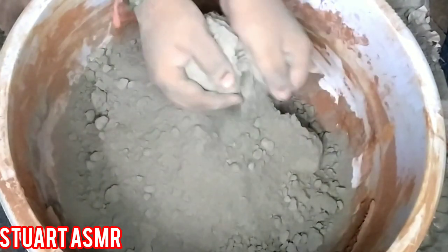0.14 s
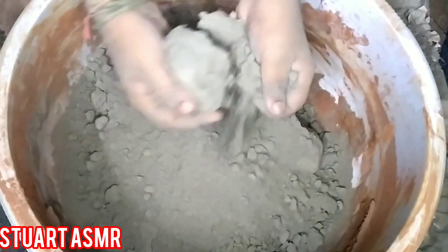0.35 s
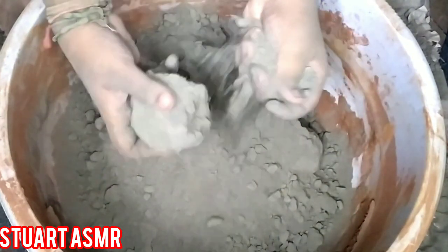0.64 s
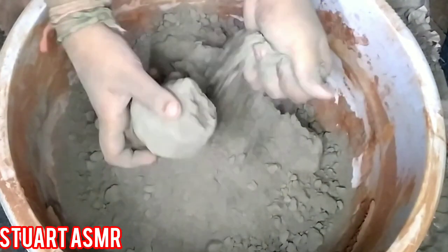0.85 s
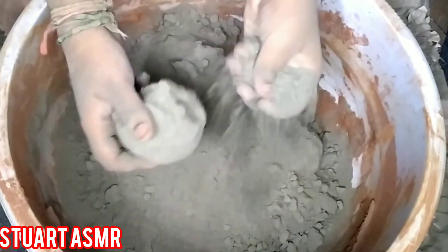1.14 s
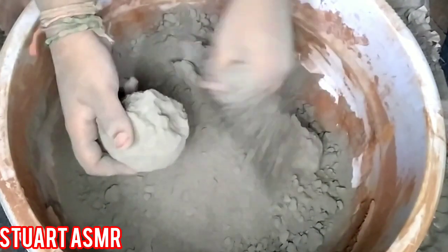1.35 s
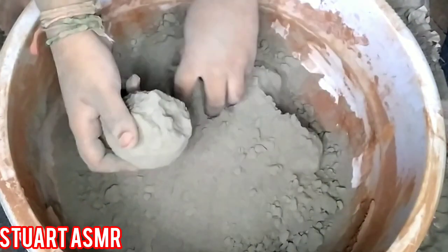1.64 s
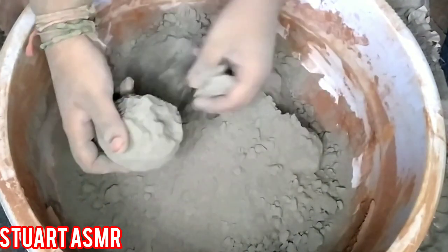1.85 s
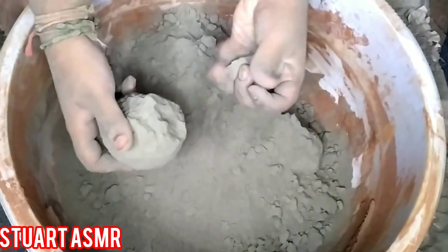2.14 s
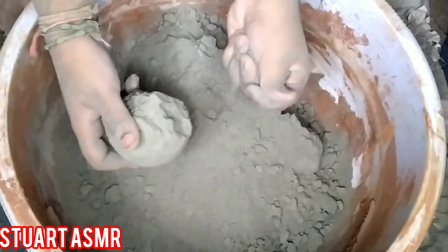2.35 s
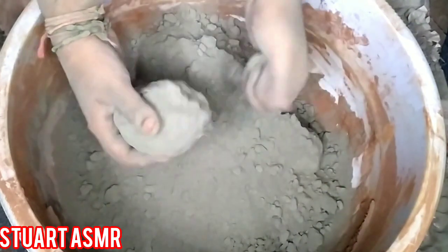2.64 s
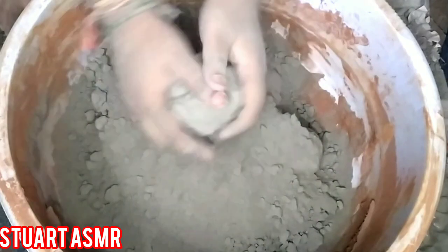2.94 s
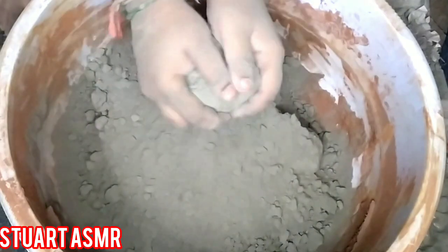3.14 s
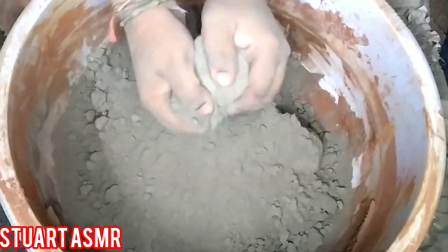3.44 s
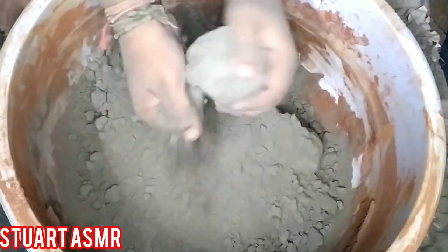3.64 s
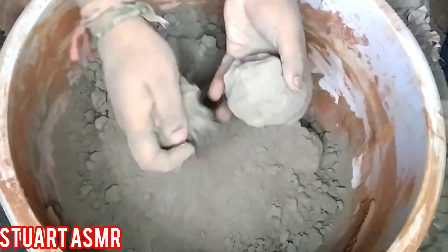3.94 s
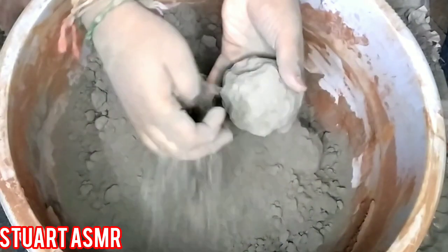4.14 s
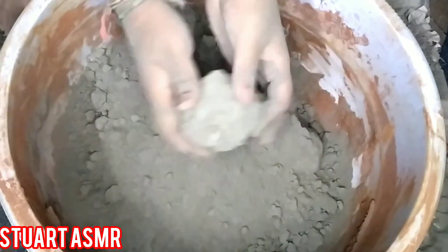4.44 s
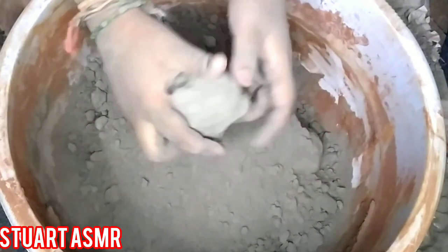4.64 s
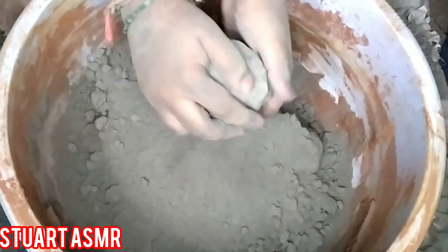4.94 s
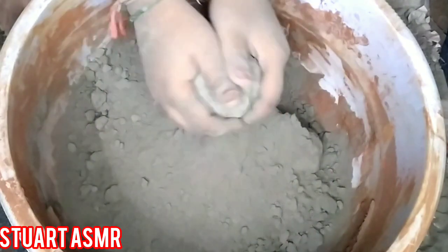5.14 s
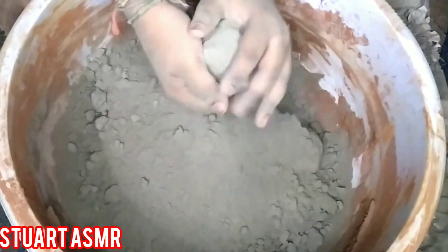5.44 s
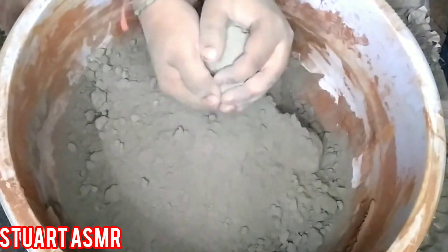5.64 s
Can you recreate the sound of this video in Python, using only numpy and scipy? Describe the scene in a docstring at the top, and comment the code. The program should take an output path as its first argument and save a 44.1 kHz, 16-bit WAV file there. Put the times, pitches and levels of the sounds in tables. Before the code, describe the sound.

Dry clods crumble in bare hands in a quiet room, miked closely. Uneven crunches, small snaps and falling grains fill the start, pause briefly over low hum, then return as scratchy grinding and hissing dust. Just after four seconds a dense cluster of harsh, clipping snaps bursts out with soft low thumps, followed by lighter grit rubbing and small ticks.

```python
"""Crushing dry cement lumps by hand

Bare hands crush dry cement lumps over a wide basin, close to a small microphone.
Random grains ring the basin, lumps, grit and dust: crumbs patter, lumps grind, fine grit hisses.
Breaks are single snaps with a dying run of splinters; low pushes make soft thumps as handfuls land.
Shaped noise makes the hum of a quiet room and one faint fuzzy whistle.
A noise suppressor breaks faint sounds into streaks, and the loudest cracks clip."""
import sys
import numpy as np
from scipy import signal
from scipy.fft import rfft, irfft
from scipy.io import wavfile
from scipy.ndimage import uniform_filter1d

SR = 44100
rng = np.random.default_rng(int(sys.argv[2]) if len(sys.argv) > 2 else 0)


def wav_out(sig):
    """Save sig, one row per channel (or a flat mono array), as 16-bit PCM at SR to the path in sys.argv[1]."""
    wavfile.write(sys.argv[1], SR, np.round(np.clip(np.atleast_2d(sig).T, -1, 1) * 32767).astype(np.int16))


N = 255780

# Ringing modes of each body: f/Hz, width before damping/Hz, strength/dB
FLOOR_MODES = [(368, 104, -1.5), (414.4, 94, 0), (510, 134, -14.5), (195, 450, -30)]
WALL_MODES = [(619, 86.5, 7.5), (860, 210, -13.5)]
BIG_LUMP_MODES = [(943, 120, 1), (1193, 213, 10), (1479, 120, 5.5), (1616, 184, 10)]
SMALL_LUMP_MODES = [(2004, 380, -3), (2532, 195, 8), (2921, 168, -0.5), (3460, 520, 6.5), (4570, 650, -2)]
GRIT_MODES = [(5085, 1600, -8.5), (6490, 370, -5.5), (7050, 230, -2), (7210, 1400, -5)]
DUST_MODES = [(8880, 3100, -3.5), (11510, 1700, -1), (13500, 1700, -7.5), (15300, 510, -11.5)]
# The four crushed bodies, coarse to fine: steps 1 to 4 on the fineness scale
CRUSHED = (BIG_LUMP_MODES, SMALL_LUMP_MODES, GRIT_MODES, DUST_MODES)
BODIES = (FLOOR_MODES, WALL_MODES) + CRUSHED
BREADTH_DB = 10  # drop in level one breadth away from the fineness


def gain_of(db):
    """Turns decibels into gain."""
    return 10 ** (np.asarray(db) / 20)


def evened(x):
    """Scales a sound to rms 1."""
    return x / np.sqrt(np.mean(x ** 2) + 1e-20)


def peaked(sound, db):
    """Scales a sound to a peak level in dB."""
    return gain_of(db) * sound / abs(sound).max()


def add(mix, s, sound):
    """Mixes a sound in at a time in seconds."""
    part = mix[round(s * SR):][:len(sound)]
    part += sound[:len(part)]


def ring(modes, chance_db=None, damping=0.87):
    """One tap on a body: dying sines whose soft start steepens the skirts of each mode, energy 1."""
    t = np.arange(1400) / SR
    hz, width, db = np.transpose(modes)[:, :, None]
    width = width * damping
    if chance_db is not None:
        db = db + chance_db[:len(modes), None]
    sign = (-1.) ** np.arange(len(modes))[:, None]
    strength = sign * gain_of(db) * np.sqrt(width)
    soft_start = (1 - np.exp(-6. * width * t)) ** 2
    sines = np.exp(-np.pi * width * t) * np.sin(2 * np.pi * hz * t)
    tap = (strength * sines * soft_start).sum(0)
    return tap / np.linalg.norm(tap)


def shares_db(fineness, breadth):
    """Splits a contact over the crushed bodies: most at its fineness, less to either side."""
    step = np.arange(1, len(CRUSHED) + 1)
    distance = (step - np.clip(fineness, 0, len(BODIES))) / max(breadth, .4)
    dust_db = -10  # dust is always fainter
    return -BREADTH_DB * distance ** 2 + dust_db * (step == step[-1])


def swell_db(t, s, rise_s, fall_s):
    """A rise and fall in level: 0 dB at the peak, 20 dB down at the ends of the rise and fall."""
    roundness = 1.043  # 1 is a peaked swell, 2 a rounded one
    side_s = np.maximum(np.where(t < s, rise_s, fall_s), .005)
    return -20 * (abs(t - s) / side_s) ** roundness


def hands():
    """Level in dB of each body over time: showers add up in the basin, squeezes in the other bodies."""
    # Showers of crumbs landing in the basin: peak t/s, floor level/dB, wall level/dB, rise/s, fall/s
    shower_list = [(0.0, -41.5, -48, .1, 0.15), (0.149, -45, -46, 0.13, 0.17),
                   (.26, -42.5, -41.5, 0.18, 0.73), (.37, -42.5, -50, 0.45, 0.115),
                   (0.47, -40.5, -50.5, 0.075, 0.2), (.57, -43, -44.5, 0.1, 0.32),
                   (0.738, -38, -54, 0.12, 0.27), (0.9, -48.5, -52, 0.031, 0.53),
                   (1.04, -41, -50, 0.24, 0.2), (1.24, -62.5, -51, 0.095, .15),
                   (1.31, -40.5, -64, 0.098, 0.17), (1.462, -41, -42.5, 0.52, 0.22),
                   (1.539, -39, -39.5, 0.34, 0.13), (1.62, -47.5, -52, 0.086, 0.44),
                   (1.78, -61.5, -47.5, 0.077, 0.14), (2.411, -51, -74, 0.041, 0.14),
                   (2.699, -42.5, -73, 0.18, 0.22), (2.85, -45.5, -61, 0.025, 0.14),
                   (2.919, -40, -44.5, 0.12, 0.14), (3.09, -70.5, -54.5, 0.045, 0.33),
                   (3.259, -44, -72.5, 0.021, 0.036), (3.477, -45.5, -51, 0.059, 0.12),
                   (3.63, -41, -50, 0.14, 0.38), (3.78, -49, -59, .1, 0.2), (3.95, -51.5, -50, 0.25, 0.18),
                   (4.102, -39, -57, 0.051, 0.18), (4.224, -46.5, -49.5, 0.09, 0.21),
                   (4.371, -39, -38, 0.15, 0.26), (4.459, -53, -60, 0.19, 0.13),
                   (4.56, -41, -56.5, 0.08, 0.16), (4.681, -40.5, -40, 0.063, 0.18),
                   (5.371, -52.5, -51.5, 0.054, 0.32), (5.5, -50, -52, 0.068, 0.24),
                   (5.69, -67, -48.5, 0.081, 0.2)]
    # Squeezes and rubs: peak t/s, level before sharing/dB, fineness/steps, breadth/steps, rise/s, fall/s
    squeeze_list = [(.005, -39, 2.64, 1.87, 0.18, 0.13), (0.164, -40.5, 1.8, 7.5, 0.063, 0.25),
                    (.25, -40, 1.8, 0.71, 0.31, 0.11), (.4, -44, 1.67, 1.02, 0.92, 0.25),
                    (0.531, -40.5, 1.78, 1.12, 0.22, 0.19), (.65, -45, 2.07, 1.6, 0.11, 0.68),
                    (.73, -43.5, 3.5, 1.3, 0.31, 0.026), (0.886, -36, 2.82, 1.83, 0.071, 0.13),
                    (0.988, -38.5, .7, 1.14, 0.066, 0.082), (1.095, -41, 2.97, 0.92, 0.047, 0.11),
                    (1.136, -43, 1.57, 0.74, 0.39, 0.19), (1.251, -42, 1.94, 1.08, 0.032, 0.42),
                    (1.449, -38.5, 0.32, 1.3, 0.097, 0.1), (1.526, -36, 1.64, 1.03, 0.14, 0.13),
                    (1.7, -49.5, 1.79, 1.15, 0.11, 0.56), (2.35, -46, 1.88, 0.8, 0.15, 0.24),
                    (2.395, -44, 2.87, 1.16, 0.1, 0.083), (2.491, -41, 3.02, 1.74, 0.088, 0.53),
                    (2.661, -30, 4.68, 1.05, 0.06, 0.15), (2.785, -40.5, 2.4, 0.84, 0.018, 0.097),
                    (2.879, -38, 1.38, 1.05, 0.09, 0.18), (3.016, -47, 1.1, 1.2, 0.017, 0.14),
                    (3.028, -38, 2.95, 1.46, 0.067, 0.12), (3.261, -38, 2.77, 1.22, 0.018, 0.06),
                    (3.36, -53, 1.8, 0.63, 0.032, 0.57), (3.478, -43, 2.53, 0.97, 0.3, 0.18),
                    (3.616, -35, 2.8, 1.76, 0.15, 0.1), (3.66, -36, 0.34, 1.06, 0.23, 0.055),
                    (3.7, -40, 2.33, 1.9, 0.12, 0.18), (3.75, -39.5, 2.84, 1.46, 0.13, 0.02),
                    (3.959, -31, 5.19, 3.3, 0.057, 0.14), (4.099, -37.5, 3.8, 2.7, 0.047, 0.049),
                    (4.18, -33.5, 1.66, 2.3, 0.085, 0.14), (4.24, -36, 2.24, 2, 0.067, 0.42),
                    (4.345, -28.5, 0.91, 2.2, 0.062, 0.16), (4.42, -38, 2.9, 1.1, 0.22, 0.41),
                    (4.491, -39, 1.1, 4.4, 0.074, 0.046), (4.6, -43, 0.72, 1.8, 0.087, 0.089),
                    (4.671, -31.5, 0.27, 2.35, 0.028, 0.096), (4.74, -38, 0.52, 1.2, 0.15, 0.22),
                    (4.819, -35.5, 2.93, 1.63, 0.14, 0.15), (4.981, -41.5, 3.03, 0.82, 0.1, 0.46),
                    (5.113, -44.5, 2.66, 0.91, .015, 0.12), (5.264, -40, 3.02, 1.2, 0.14, 0.19),
                    (5.379, -38, 3.12, 2.27, 0.06, 0.077), (5.429, -44.5, 2.7, 2, .08, 0.14),
                    (5.509, -40, 1.47, 2.2, 0.028, 0.077), (5.64, -47, 2.66, 0.62, 0.3, 0.032),
                    (5.772, -48, 2.4, 1.4, 0.21, 0.061)]
    t = np.arange(0, N + 64, 64) / SR
    power = np.full((len(BODIES), len(t)), 1e-10)
    for s, floor_db, wall_db, rise_s, fall_s in shower_list:
        basin_db = np.array([[floor_db], [wall_db]])
        power[:2] += gain_of(basin_db + swell_db(t, s, rise_s, fall_s)) ** 2
    for s, db, fineness, breadth, rise_s, fall_s in squeeze_list:
        body_db = db + shares_db(fineness, breadth)[:, None]
        power[2:] += gain_of(body_db + swell_db(t, s, rise_s, fall_s)) ** 2
    return t, 10 * np.log10(power)


def patchy(x, patch_db, level_db):
    """The grip keeps shifting, so narrow bands come and go while the loudness stays."""
    grip_s = 0.046  # time over which a band's random drift fades
    z = signal.stft(x, nperseg=512, noverlap=384)[2]
    # one random value for every three neighbouring bands, smoothed over time
    field = rng.standard_normal((z.shape[1], len(z) // 3 + 1)).T
    field = np.repeat(field, repeats=3, axis=0)[:len(z)]
    field = uniform_filter1d(field, size=5, axis=1)
    field = evened(signal.lfilter([1], [1, -np.exp(-128 / SR / grip_s)], field))
    # hard work means many contacts, which even out
    few = np.clip((-24.5 - level_db[::128]) / 20.8, .15, 1)
    patch_db = patch_db * np.pad(few, (0, len(field[0]) - len(few)), "edge")
    gain = gain_of(patch_db * np.clip(field, -2, .9))
    # keep the loudness of every moment
    colour = (abs(z) ** 2).mean(1, keepdims=True)
    gain /= np.sqrt((gain ** 2 * colour).sum(0) / colour.sum())
    return signal.istft(z * gain, nperseg=512, noverlap=384)[1][:N]


def crumbling():
    """Uneven random grains strike each body; hard work deadens the ring and throws splinters."""
    # Grains striking each entry of BODIES in turn: rate/(1/s), spread of grain size/dB,
    # patchiness in light work/dB, width factor of the modes when crushed hard/1
    grain_list = [(562.5, 3, -0.5, 1.02), (575, 4, 6, 1.5), (880, 3, 6, 2.4), (1415, 3, 9, 3.8),
                  (3920, 3.5, 13, 3), (4970, 4, 11.5, 0.66)]
    crush_db, crush_range_db = -37, 10  # from this level up the tight grip deadens the ring
    hard_db, hard_range_db = -46, 17  # splinters grow from this level, in full this much higher
    s, levels_db = hands()
    t, out = np.arange(N) / SR, np.zeros(N)
    effort_db = np.interp(t, s, 10 * np.log10((gain_of(levels_db) ** 2).sum(0)))
    splinters = evened((rng.random(N) < 220 / SR) * rng.standard_normal(N))  # 220 per second
    splinters = splinters * np.clip((effort_db - hard_db) / hard_range_db, .1, 1)
    crush = np.clip((effort_db - crush_db) / crush_range_db, 0, 1)
    for modes, body_db, grain in zip(BODIES, levels_db, grain_list):
        per_s, spread_db, patch_db, damping = grain
        hit = rng.random(N) < per_s / SR
        sign = rng.choice([-1., 1.], N)
        size = np.minimum(rng.exponential(1, N), 4)
        train = evened(hit * sign * gain_of(spread_db * size))
        level_db = np.interp(t, s, body_db)
        free = signal.oaconvolve(train, ring(modes))[:N]
        free = evened(patchy(free, patch_db, level_db))
        blows = np.sqrt(crush) * train + 0.35 * splinters
        crushed = signal.oaconvolve(blows, ring(modes, damping=damping))[:N]
        out += gain_of(level_db) * (np.sqrt(1 - crush) * free + crushed)
    return out


def room():
    """Steady low rumble and microphone hiss: noise shaped by frequency."""
    # Colour of the background: f/Hz, relative level per Hz/dB
    room_colour = [(12, -28.5), (20, 5.5), (65, 0), (370, -7.5), (520, -14.5), (800, -17.5), (1600, -21),
                   (4500, -34), (7100, -25), (9500, -24.5), (10200, -34), (16000, -41.5)]
    room_db = -44.5  # rms level
    hz = np.fft.rfftfreq(N, 1 / SR)
    f, db = np.transpose(room_colour)
    shape = gain_of(np.interp(np.log(hz + 1), np.log(f + 1), db))
    return gain_of(room_db) * evened(irfft(rfft(rng.standard_normal(N)) * shape, N))


def lump_snap(fineness, breadth, spot):
    """Ring of a breaking lump: the modes near its fineness sound most, each with some chance."""
    step_hz, octaves_per_step = 1300, 1.1  # pitch of fineness 1, and the width of a step
    colour_chance_db = 2  # chance in the strength of each mode
    damping = 1 + 0.19 * fineness ** 2  # finer breaks ring with wider modes
    lump = 0
    for k, (modes, share_db) in enumerate(zip(CRUSHED, shares_db(fineness, breadth))):
        step = 1 + np.log2(np.transpose(modes)[0] / step_hz) / octaves_per_step
        distance = (step - fineness) / max(breadth, .4)
        colour_db = colour_chance_db * spot[5 * k:][:len(modes)] - BREADTH_DB * distance ** 2
        lump = lump + peaked(ring(modes, colour_db - colour_db.max(), damping), share_db)
    return lump


def cracks():
    """A break is one snap and a dying run of splinters; it rings the basin and the lump."""
    # Cracks and knocks: t/s, floor peak level/dB, wall peak level/dB, lump peak level/dB,
    # fineness/steps, breadth/steps
    crack_list = [(0.098, -56, -34, -29, 2.2, 0.77), (0.1316, -29, -43, -25.5, 2.1, 0.65),
                  (0.1778, -38, -42, -24.5, 1, 1.2), (0.219, -40, -22, -18.5, 1, 1.75),
                  (0.2901, -30, -35, -31, 0.9, 0.94), (0.3346, -21, -30, -27, 0.54, 2),
                  (0.3606, -31.5, -35, -28, 0.69, 0.88), (0.461, -35, -33, -32, 1.6, 1.1),
                  (0.5062, -53, -43, -24, 1.83, 0.91), (0.5445, -27, -21.5, -24.5, 1.6, 1.2),
                  (0.707, -26, -39, -33, 3.1, 2.7), (0.79, -49, -49, -23, 2.18, 2.2),
                  (0.8585, -59, -65, -18, 2.3, 1.85), (0.8893, -31.5, -30.5, -27, 3.4, 2.4),
                  (0.931, -36, -31, -32, 1.3, 3.3), (0.976, -34, -34.5, -23, 1, 1.5),
                  (1.009, -30, -48, -30.5, 0.5, 3), (1.127, -38, -43, -22, 1.61, 0.41),
                  (1.2222, -69, -36, -27.5, 2.26, 0.88), (1.247, -52, -45, -31.5, 1.6, 1),
                  (1.261, -56, -43, -30.5, 2.1, 0.52), (1.291, -31, -36, -21.5, 2.05, 0.91),
                  (1.3598, -34, -23.5, -22, 1.2, 1.44), (1.425, -18.5, -11, -13.5, 0.57, 1.7),
                  (1.458, -28, -45, -33, 1.3, 1.5), (1.809, -35, -82, -49, 2.1, 3.6),
                  (1.905, -45, -39, -47.5, 3.4, 1.3), (2.387, -32, -51, -45, 1.7, 0.93),
                  (2.565, -51, -48, -27.5, 1.89, 1.3), (2.846, -34, -43, -21, 1.46, 1.3),
                  (2.866, -42, -56, -23, 1.05, 1.3), (2.872, -30.5, -82, -19.5, 1.16, 0.88),
                  (2.925, -32, -47, -29.5, 1.6, 1.3), (3.011, -52, -53, -29, 1.37, 0.41),
                  (3.077, -48, -38, -35, 1.4, 0.33), (3.2521, -42, -58, -27.5, 2.55, 0.49),
                  (3.526, -27, -39.5, -32, 1.26, 0.85), (3.597, -49.5, -49, -23.5, 0.55, 0.98),
                  (3.612, -29.5, -46, -41, 1, 2), (3.718, -46, -32, -30, 4.4, 1.4),
                  (3.7569, -35, -43.5, -33, 3.8, 1.3), (3.783, -30.5, -41.5, -29, 2.1, 0.59),
                  (3.8558, -32.5, -38.5, -27.5, 3.3, 6.1), (4.1501, -37.5, -27, 4, 2.92, 3.1),
                  (4.153, -34.5, -28.5, -6, 1.3, 2.7), (4.17, -61, -45, -2, 3.27, 2.3),
                  (4.18, -63, -41, -13, 3.4, 2.5), (4.1985, -41, -45, -16, 3.4, 1.2),
                  (4.205, -43.5, -44.5, -21, 2.5, 1.2), (4.209, -31, -25, -27, 1.8, 2),
                  (4.2398, -55.5, -47, -29, 3, 1.2), (4.2444, -34, -39, -13, 2.1, 0.66),
                  (4.2552, -36.5, -39, 1, 3.17, 2.5), (4.268, -49, -35, -20, 0.68, 1),
                  (4.2903, -46, -39, -11.5, 0.7, 1.8), (4.3128, -44.5, -52, -22, 2.4, 2),
                  (4.3285, -49, -48, -5, 2.74, 1.85), (4.348, -37, -39, -25, 1.2, 1.7),
                  (4.352, -30.5, -47, -3.5, 2.88, 0.88), (4.3554, -38, -32, -12, 1.2, 1.4),
                  (4.36, -50, -41, -5, 2.3, 2.4), (4.394, -47, -38, -6.5, 1.9, 2.4),
                  (4.396, -43, -30, -12.5, 0.43, 0.54), (4.4507, -38.5, -32, -22, 1.2, 2.1),
                  (4.4608, -46, -34, -17, 2, 2.8), (4.4706, -38, -35, -21, 2, 1.7),
                  (4.5, -46, -43.5, -30, 2.1, 2.2), (4.573, -33.5, -44, -34, 0.9, 0.69),
                  (4.58, -43.5, -44.5, -19.5, 0.31, 1.1), (4.6549, -18.5, -15.5, -3, 0.21, 1.46),
                  (4.782, -51, -50, -5.5, 3.9, 3.2), (4.8092, -49.5, -56.5, -7.5, 2.55, 1.73),
                  (5.338, -35, -61, -53, 2.2, 1.7), (5.3779, -47, -39, -28, 3.2, 2.8),
                  (5.474, -39, -42, -34.5, 1.2, 0.98), (5.505, -43.5, -37, -25, 3.6, 3.1),
                  (5.517, -44, -41, -28.5, 1.3, 1.5)]
    rattle_t60_s, fine_share = 0.023, 0.18  # splinter run at fineness 0, shortened by this share a step
    bounce_t60_s = 0.014  # how long the pieces keep striking the basin
    rattle_db, bounce_db = -13, -7  # level of splinters and bouncing pieces against the first snap
    out, t = np.zeros(N), np.arange(1500) / SR
    chance = rng.standard_normal((len(crack_list), 3, len(t)))
    for crack, (size, hit, spot) in zip(crack_list, chance):
        s, floor_db, wall_db, lump_db, fineness, breadth = crack
        pieces = size * (hit > 1.2)
        rattle = pieces * gain_of(rattle_db - 60 * t / (rattle_t60_s * (1 - fine_share) ** fineness))
        bounce = pieces * gain_of(bounce_db - 60 * t / bounce_t60_s)
        rattle[0], bounce[0] = 1, 1  # the first snap
        lump = lump_snap(fineness, breadth, spot)
        floor = ring(FLOOR_MODES, 3 * spot[-5:])  # 3 dB of chance in each mode
        wall = ring(WALL_MODES)
        for blows, body, db in ((rattle, lump, lump_db), (bounce, floor, floor_db), (bounce, wall, wall_db)):
            add(out, s, peaked(signal.fftconvolve(blows, body), db))
    return out


def walls(x):
    """Short tail of sparse reflections from the basin wall and the room."""
    taps, at = np.zeros(8000), np.arange(90, 7900, 22)
    fade = gain_of(-60 * at / SR / 0.046)  # falls 60 dB in 0.046 s
    reflections = rng.choice([-1., 1.], len(at)) * fade
    taps[at + rng.integers(0, 22, len(at))] = reflections
    return signal.oaconvolve(x, taps / np.linalg.norm(taps))[:N]


def thumps():
    """A handful landing gives a cycle or two of low push."""
    # Soft low thumps: t/s, peak level/dB, f/Hz
    thump_list = [(0.13, -27.5, 98), (0.219, -29.5, 104), (2.884, -32, 87.7), (4.146, -31.5, 148),
                  (4.249, -28.5, 187), (4.278, -28, 196), (4.368, -29.5, 190)]
    turns = 0.34  # cycles until the swell of a thump peaks
    out, t = np.zeros(N), np.arange(3000) / SR
    for s, db, hz in thump_list:
        push = np.sin(2 * np.pi * hz * t) * t * np.exp(-t * hz / turns)
        add(out, s, peaked(push, db))
    return out


def whistle():
    """A narrow band of noise follows a gliding pitch, which makes the whistle fuzzy."""
    # Path of the whistle: t/s, level/dB, f/Hz
    whistle_path = [(1.628, -52.5, 4950), (1.799, -53.5, 5260), (2.0, -49, 5300), (2.271, -50, 5340),
                    (2.4, -62, 5440)]
    s, level_db, hz = np.transpose(whistle_path)
    t = np.arange(s[0], s[-1], 1 / SR)
    # slow noise below 125 Hz, shifted up to the pitch
    fuzz = signal.lfilter(*signal.butter(4, 125 / SR * 2), rng.standard_normal((2, len(t))))
    turn = np.exp(2j * np.pi * np.cumsum(np.interp(t, s, hz)) / SR)
    tone = evened(((fuzz[0] + 1j * fuzz[1]) * turn).real)
    fade = signal.windows.tukey(len(t), .15)
    out = np.zeros(N)
    add(out, s[0], tone * gain_of(np.interp(t, s, level_db)) * fade)
    return out


def suppress(x):
    """Noise suppressor: turns down bands that barely rise over their usual quiet level."""
    z = signal.stft(x, nperseg=512, noverlap=384)[2]
    power = uniform_filter1d(abs(z) ** 2, size=3, axis=1)
    power = uniform_filter1d(power, size=12, axis=2, origin=3)  # looks mostly back, so it shuts late
    quiet = np.percentile(power, 15, axis=2, keepdims=True)
    over_db = 10 * np.log10(abs(power) / quiet + 1e-9)
    gain = gain_of(-9. / (1 + np.exp((over_db - 9.5) / 1.72)))  # at most 9 dB down
    return signal.istft(z * gain, nperseg=512, noverlap=384)[1][:, :N]


def scene():
    """Hands over the basin, in the room; the cracks also echo."""
    snaps = cracks()
    echoes = gain_of(-12.5) * walls(snaps)
    near = snaps + echoes + crumbling() + thumps()
    return (near + whistle() + room())[None]


def record(dry):
    """Noise suppression; the loudest cracks clip; then the treble is cut off."""
    edge_hz = 16200
    clipped = np.clip(suppress(dry), -1, 1)
    lowpass = signal.firwin(511, edge_hz, window=("kaiser", 9), fs=SR)[None]
    return signal.oaconvolve(clipped, lowpass, "same")


dry = scene()
out = record(dry)
wav_out(out)
```